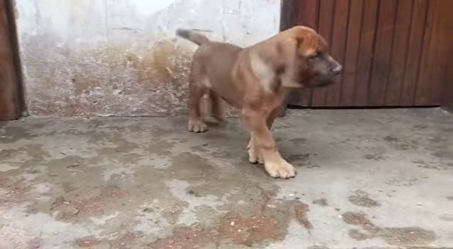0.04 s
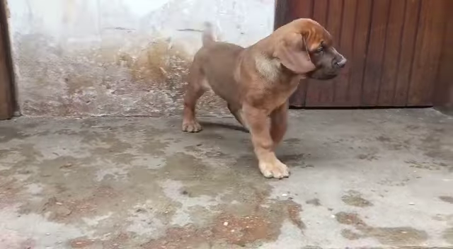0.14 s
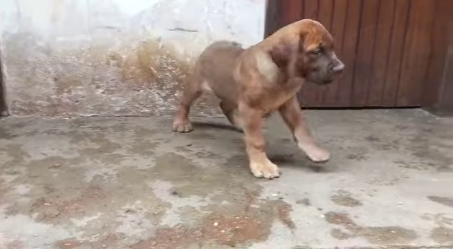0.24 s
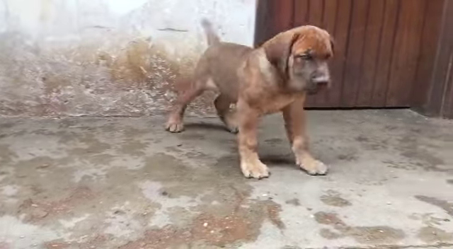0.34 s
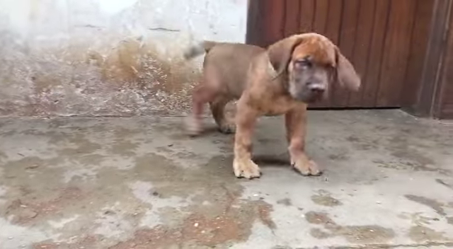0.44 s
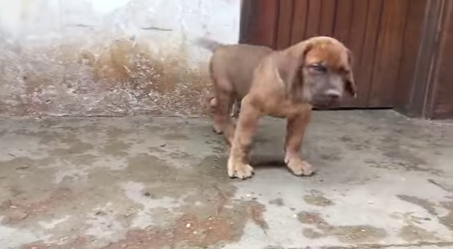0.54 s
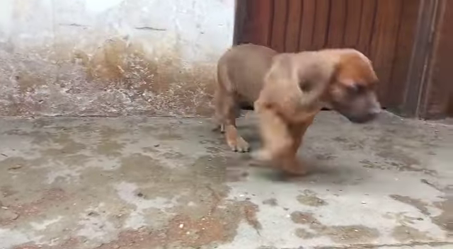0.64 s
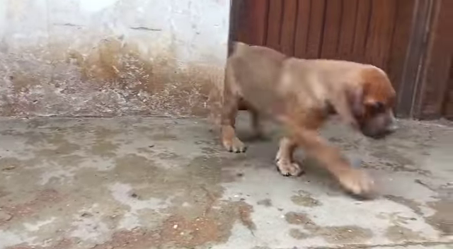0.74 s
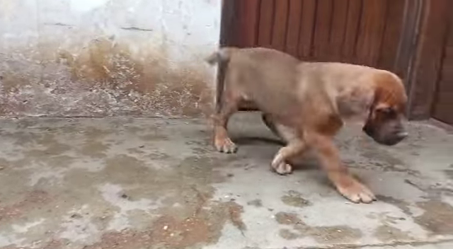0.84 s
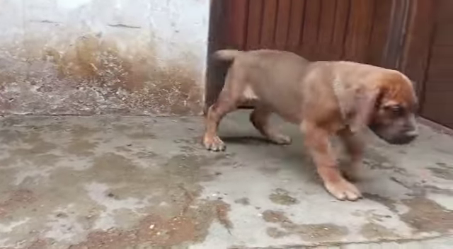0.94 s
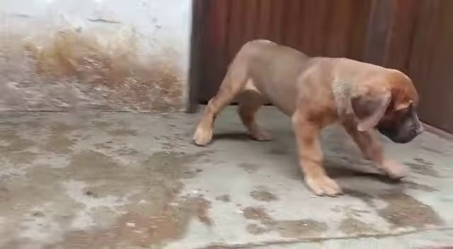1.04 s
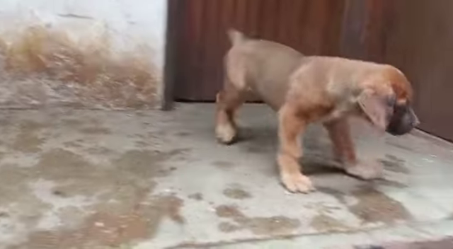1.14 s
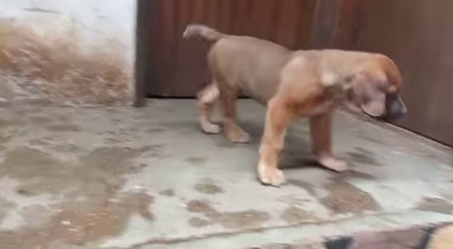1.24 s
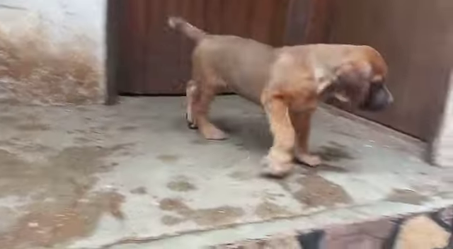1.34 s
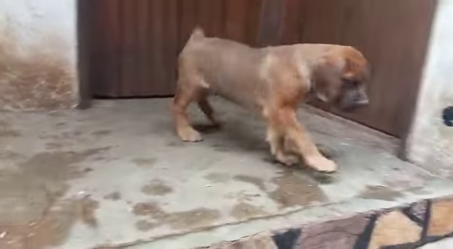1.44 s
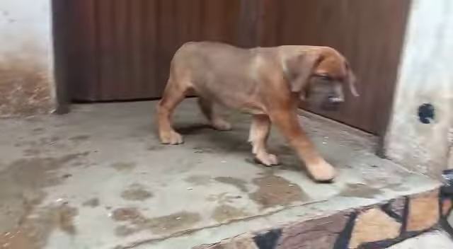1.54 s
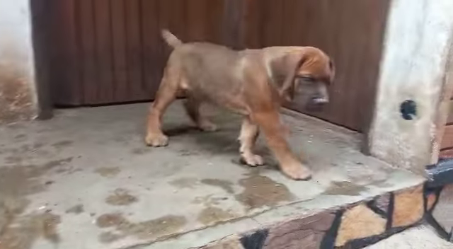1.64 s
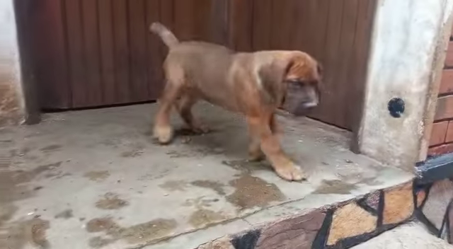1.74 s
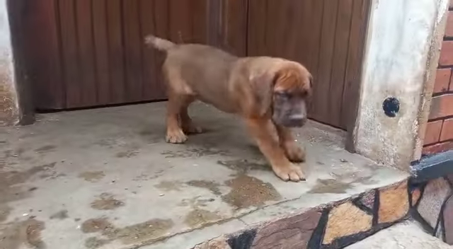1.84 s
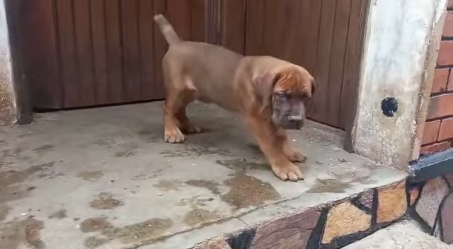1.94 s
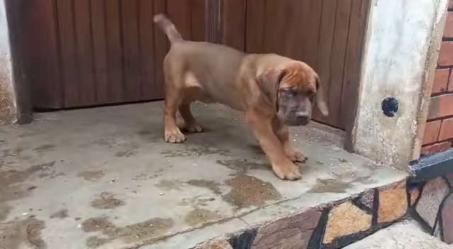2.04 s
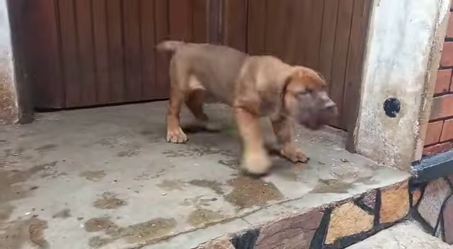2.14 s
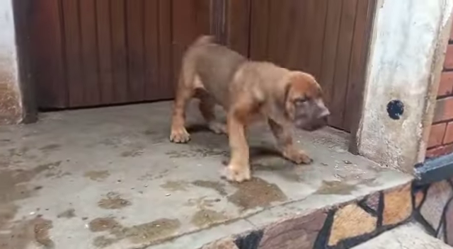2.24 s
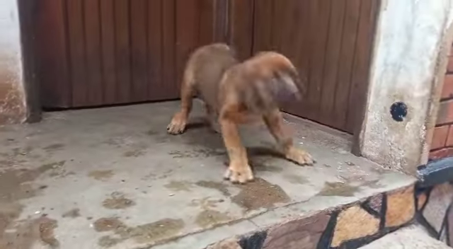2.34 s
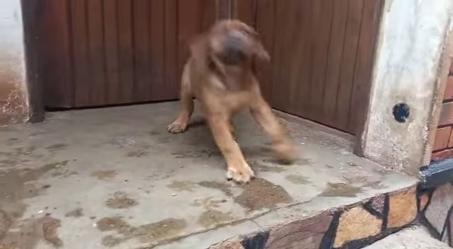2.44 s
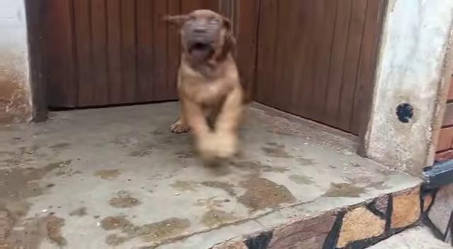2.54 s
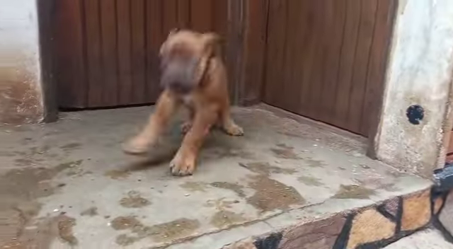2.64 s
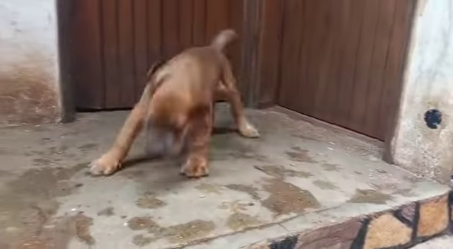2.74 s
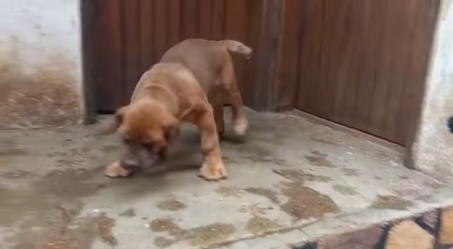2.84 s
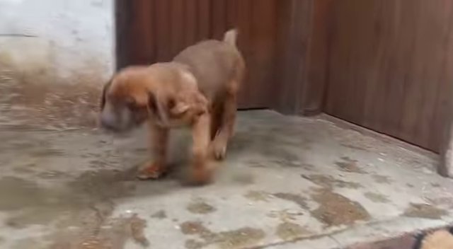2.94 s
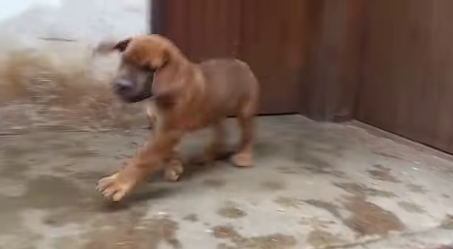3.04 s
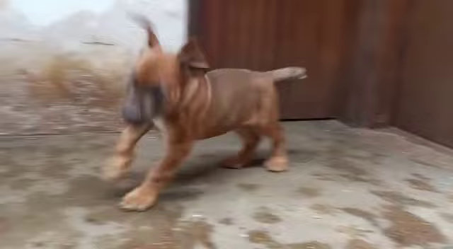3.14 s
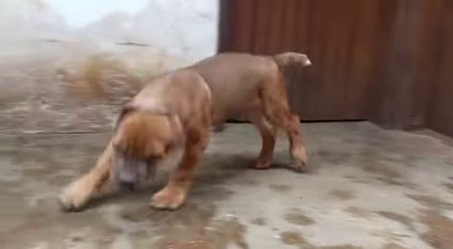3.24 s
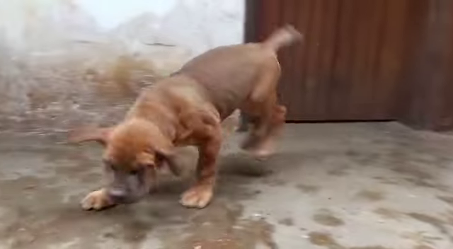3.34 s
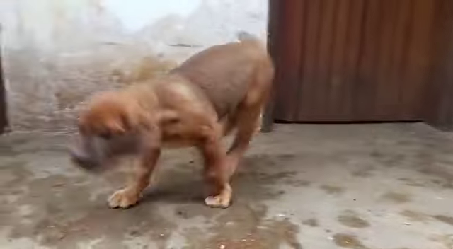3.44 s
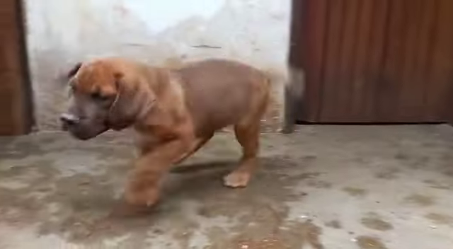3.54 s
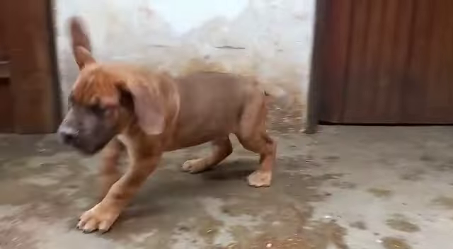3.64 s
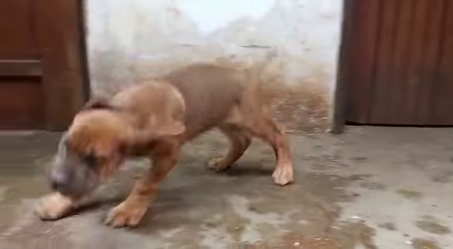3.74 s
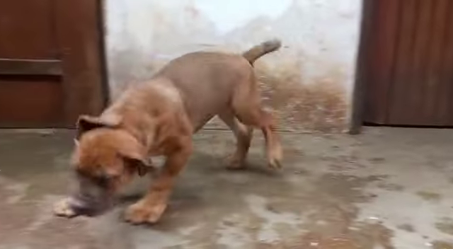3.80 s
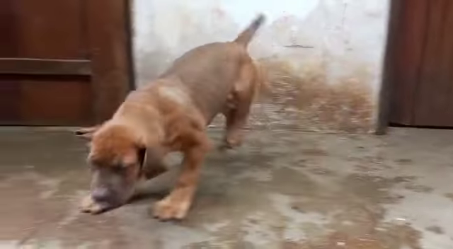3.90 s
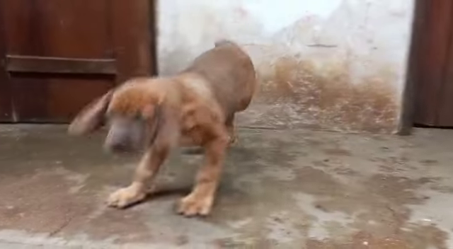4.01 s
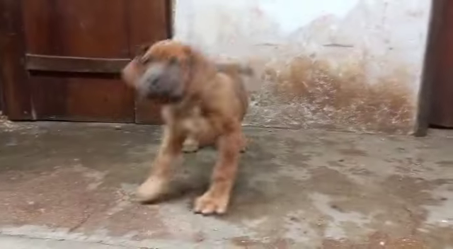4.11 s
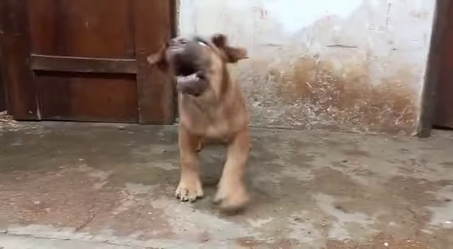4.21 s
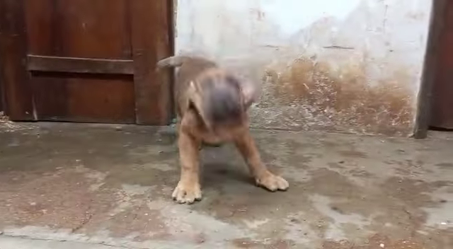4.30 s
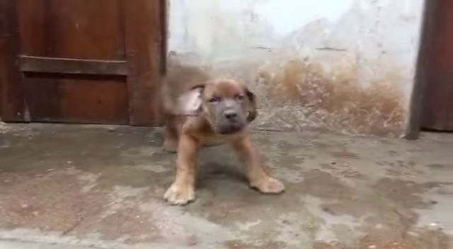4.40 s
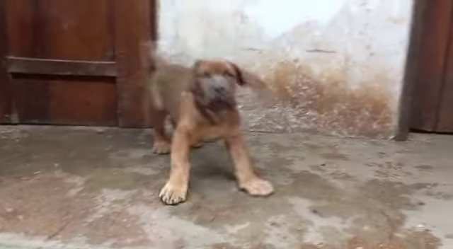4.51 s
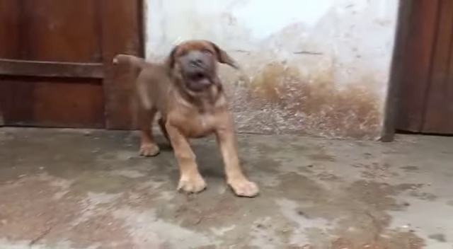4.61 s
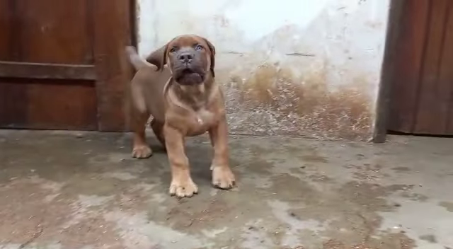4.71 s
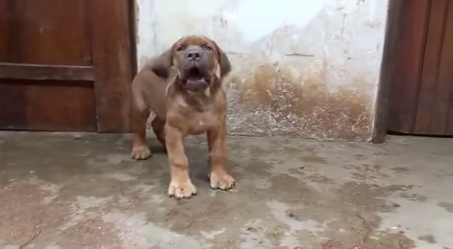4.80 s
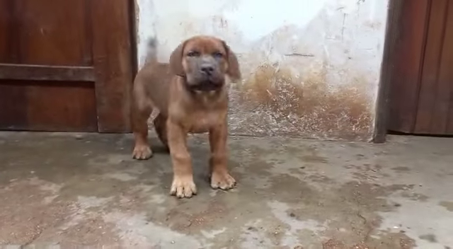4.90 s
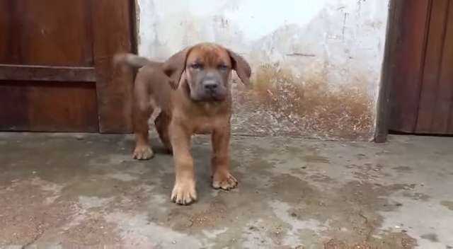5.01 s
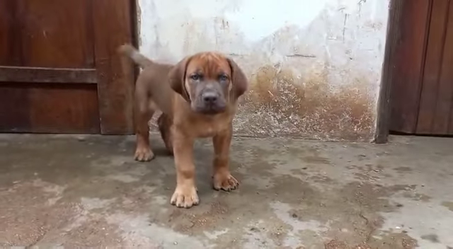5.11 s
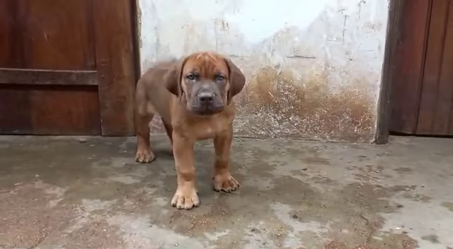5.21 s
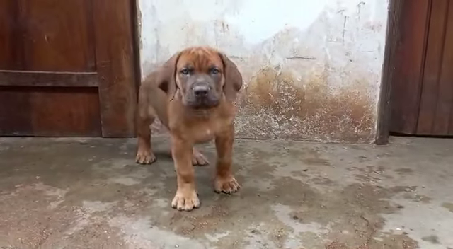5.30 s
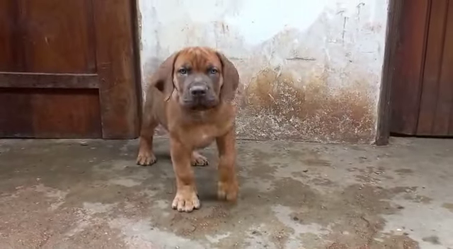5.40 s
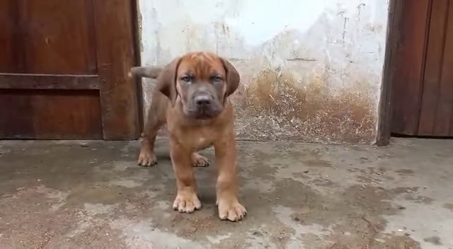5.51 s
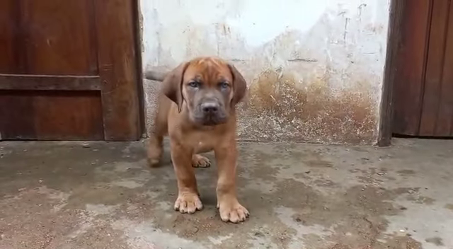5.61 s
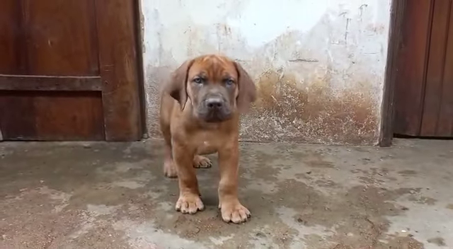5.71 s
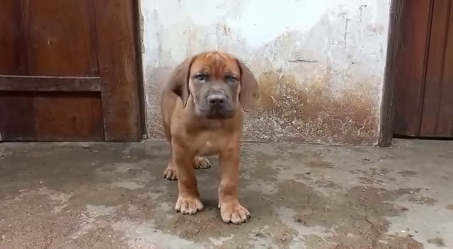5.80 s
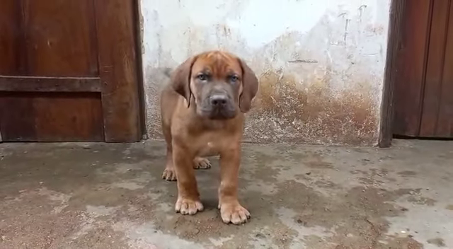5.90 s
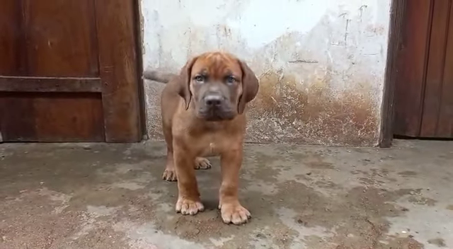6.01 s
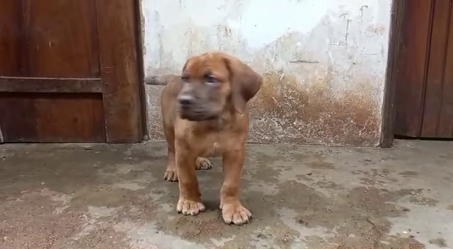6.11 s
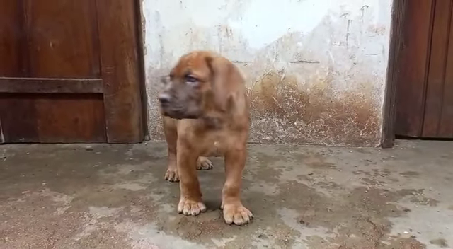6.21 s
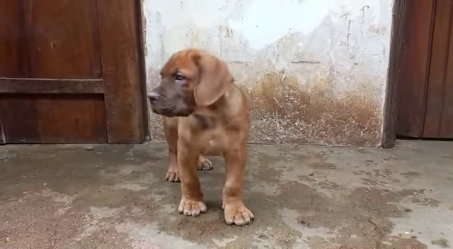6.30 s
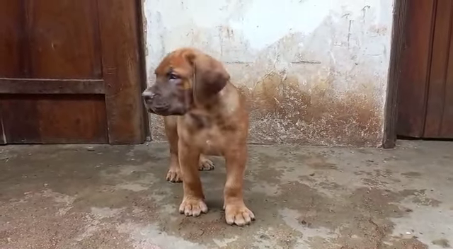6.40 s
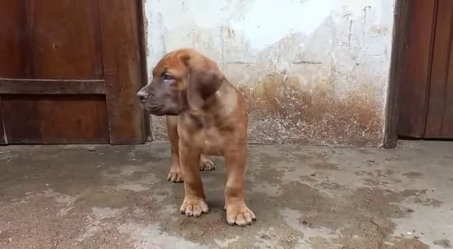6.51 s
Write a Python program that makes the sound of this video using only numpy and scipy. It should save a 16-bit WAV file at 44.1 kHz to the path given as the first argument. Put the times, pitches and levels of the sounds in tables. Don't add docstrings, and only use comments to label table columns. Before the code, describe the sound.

A young dog in a walled concrete yard, heard close by on a phone. Five high cracking yelps, framed by thin nose whistles, lead to a loud falling cry. Four rough, much louder barks follow, mixed with squeaks and low whines. One last cry sinks into a long soft whimper, then quiet hiss, claw ticks and distant metal knocks.

```python
import sys
import numpy as np
from scipy import signal
from scipy.fft import rfft, irfft, next_fast_len
from scipy.io import wavfile
from scipy.ndimage import uniform_filter1d, minimum_filter1d

SR = 44100
rng = np.random.default_rng(int(sys.argv[2]) if len(sys.argv) > 2 else 0)


def attenuation_scalar(level_db):
    decades = np.asarray(level_db, float) / 20
    return 10 ** decades


def transcribe(u):
    v = np.clip(np.atleast_2d(u).T, -1, 1)
    q = np.round(v * 32767).astype(np.int16)
    wavfile.write(sys.argv[1], SR, q)


N = 288855


def evened(x):
    return x / np.sqrt(np.mean(x ** 2) + 1e-20)


def read(points, hz):
    f, value = np.transpose(points)
    return np.interp(np.log(hz + 1), np.log(f + 1), value)


def along(rows, column=1):
    rows = np.array(rows)
    return np.interp(np.arange(N) / SR, rows[:, 0], rows[:, column])


def add(mix, s, sound):
    part = mix[..., round(s * SR):][..., :sound.shape[-1]]
    part += sound[..., :part.shape[-1]]


def colour(x, gain_db):
    size = next_fast_len(x.shape[-1])
    gain = attenuation_scalar(gain_db(np.fft.rfftfreq(size, 1 / SR)))
    return irfft(rfft(x, size) * gain, size)[..., :x.shape[-1]]


def noise(count):
    return rng.standard_normal(-(-count // 8192) * 8192)[:count]


def wobble(count, span):
    once = uniform_filter1d(noise(count), int(span))
    return evened(uniform_filter1d(once, int(span)))


def patchy(x, depth_db, bins, frames):
    z = signal.stft(x, nperseg=256)[2]
    field = noise(z.shape[-2] * z.shape[-1]).reshape(z.shape[-1], -1).T
    field = uniform_filter1d(uniform_filter1d(field, int(bins), 0), int(frames), 1)
    return signal.istft(z * attenuation_scalar(depth_db * evened(field)), nperseg=256)[1][..., :x.shape[-1]]


def diffuse(pair):
    # (f/Hz, left-right likeness [0-1])
    likeness = [(50, 0.67), (300, 0.98), (800, 0.7), (1500, 0.16), (4000, 0.067), (15000, 0.14)]
    z = rfft(pair)
    same = np.clip(read(likeness, np.fft.rfftfreq(pair.shape[1], 1 / SR)), 0, 1)
    return irfft([z[0], same * z[0] + np.sqrt(1 - same ** 2) * z[1]], pair.shape[1])


def aim(sound, side_db, lead):
    at = np.arange(len(sound))
    late = np.interp(at - lead, at, sound)
    return np.array([sound * attenuation_scalar(side_db / 2), late * attenuation_scalar(-side_db / 2)])


def background(dog):
    # (t/s, level/dB)
    gate_curve = [(0, -8), (.45, -17.5), (.9, -1.5), (1.55, -0.5), (2.05, -1), (2.2, -6.5), (2.24, -6.5),
                  (2.6, -8), (3.0, -9.5), (3.4, -4.5), (3.6, -12), (4.15, -3), (4.55, -12.5), (5.2, -12.5),
                  (5.75, -12.5), (6.55, -1.5)]
    # (t/s, half-width/s, level/dB)
    rumble_swells = [
        (5.137, 0.37, 30),
        (3.37, .08, 11),
        (3.56, 0.051, 11),
        (3.8, .06, 7.5),
        (6.38, 0.066, 7.5),
        (0.34, 0.066, 9.5),
    ]
    # (f/Hz, level/dB per Hz)
    hiss_curve = [(240, -34), (400, -12), (466, 0), (1340, -6.5), (4510, -1), (5850, -3.5), (6410, -6.5),
                  (7940, -11), (8710, -26.5), (12200, -14.5), (15600, -17)]
    # (f/Hz, level/dB per Hz)
    rumble_curve = [(15, -50.5), (25, -18), (43, -22), (81, -0.5), (144, -7.5), (231, -2.5), (371, -6.5),
                    (450, -6.5), (580, -39), (990, -120)]
    hiss, deep, upper = (diffuse(rng.standard_normal((2, N))) for _ in range(3))
    loud_db = 10 * np.log10(abs(uniform_filter1d((dog ** 2).mean(0), 1500)) + 1e-9)
    gate_db = along(gate_curve)
    bark_db = 0.6 * uniform_filter1d(np.maximum(loud_db + 29.5, 0), size=4000)
    t = np.arange(N) / SR
    swell_db = sum(db * np.exp(-((t - s) / width) ** 2) for s, width, db in rumble_swells)

    hiss = hiss * attenuation_scalar(0.45 * np.maximum(loud_db + 57.5, 0))
    hiss = patchy(hiss, depth_db=4.0, bins=3.1, frames=7.7)
    hiss = colour(hiss, lambda f: read(hiss_curve, f) + 6.0)
    hiss = hiss * attenuation_scalar(-63 + 0.87 * gate_db + 2.3 * wobble(N, 1500))

    lumps_db = 1.6 * wobble(N, 2500)
    swell_db = swell_db + lumps_db
    deep = evened(colour(deep, lambda f: read(rumble_curve, f) - 40 * (f > 180)))
    deep_db = -65 + 1.7 * gate_db + 0.6 * bark_db + 0.37 * swell_db
    deep = deep * attenuation_scalar(lumps_db + deep_db + 0.97 * wobble(N, 1500))
    upper = evened(colour(upper, lambda f: -18 * np.log2((f + 1) / 270) ** 2))
    upper = upper * attenuation_scalar(-63 + 1.47 * gate_db + bark_db + swell_db + 2.4 * wobble(N, 1500))
    return hiss + deep + upper


def whistle(length, start_hz, end_hz, db):
    u = np.linspace(0, 1, int(length * SR))
    high = end_hz > 5550
    waver = (0.005 + 0.013 * high) * wobble(len(u), 60)
    hz = (end_hz + (start_hz - end_hz) * np.exp(-2.5 * u)) * (1 + waver)
    phase = 2 * np.pi * np.cumsum(hz) / SR
    swell = np.minimum(u / 0.089, 1) * np.minimum((1 - u) / 0.32, 1)
    level = attenuation_scalar(db + (2.5 + 1.3 * high) * wobble(len(u), 280))
    return swell * level * (np.sin(phase) + attenuation_scalar(-21.0) * np.sin(2 * phase))


def yelp(high, low, scoop):
    start, crack, landing, high_hz, high_db = high
    held, end, low_hz, last_hz, low_db = low
    scoop_s, scoop_db, near_top = scoop
    sag_hz_per_s, fade_db_per_s = 500, 330
    mid_hz = low_hz + 0.23 * (high_hz - low_hz)
    return [(start, 0.77 * high_hz, high_db + scoop_db),
            (start + scoop_s, near_top * high_hz, high_db),
            (crack, high_hz, high_db - 4),
            ((crack + landing) / 2, mid_hz, min(high_db, low_db) - 5),
            (landing, low_hz, low_db),
            (max(held, landing + 0.001), low_hz - sag_hz_per_s * (held - landing), low_db),
            (end, last_hz, low_db - fade_db_per_s * (end - held))]


def strands(hz):
    orders = np.arange(3, 27) / 3
    drift = np.array([1 + 0.03 * wobble(len(hz), 330) for _ in orders])
    hold = np.array([attenuation_scalar(8 * wobble(len(hz), 180)) for _ in orders])
    turns = np.cumsum(orders[:, None] * hz * drift, 1) / SR
    return evened((hold * np.cos(2 * np.pi * turns)).sum(0))


def breath_puffs(hz, turns, sheen, tilt):
    # (f/Hz, level/dB per Hz)
    breath_curve = [(150, -54), (400, -46), (560, -2.5), (800, -2), (1200, -1), (1900, 1.5), (2800, -3.5),
                    (3700, -17), (4800, -20), (6200, -38), (7800, -32.5), (11000, -37.5), (15600, -43.5)]
    gusts = (1 + 0.4 * np.cos(2 * np.pi * turns)) * attenuation_scalar(2.5 * wobble(len(hz), 100))
    chaos = patchy(noise(len(hz)) * gusts, depth_db=4.5, bins=2, frames=5)
    chaos = evened(chaos) + strands(hz)
    floor_hz = 0.5 * np.median(hz)

    def shape_db(f):
        bass_cut = 30 * np.log2(np.maximum(floor_hz / (f + 1), 1))
        return read(breath_curve, f) + read(sheen, f) + tilt * np.log2((f + 1) / 2000) - bass_cut
    return evened(colour(chaos, shape_db))


def call(rows, opening, broken, mouth_hz, slope, pulse, treble, flicker):
    # (f/Hz, level/dB)
    throat_curve = [(300, -34), (520, -1), (780, 10.5), (1300, -2), (2000, 0), (2900, 8.5), (3700, -6.5),
                    (4800, -8.5), (5800, -29.5), (6600, -37), (9000, -35), (12500, -35), (15000, -41)]
    # (start t/s, end t/s, half-pitch lift/dB)
    uneven_beats = [
        (2.112, 2.146, 16),
        (4.214, 4.236, 14),
    ]
    # (t/s, half-width/s, level/dB)
    throat_swells = [(1.722, 0.011, 10), (1.394, .012, 6.5), (1.893, 0.0067, 7), (4.803, .009, 9.5),
                     (3.688, 0.0038, 3), (0.13, 0.0066, 2.5), (.245, .008, 2.5), (.934, .008, 5.5),
                     (.56, .007, 4.5), (0.73, .01, 4.5), (0.16, 0.013, 3.5), (4.225, .015, 2.5)]
    treble_points = (5000, 6100, 8000, 12500)
    break_s = 0.009
    s, *columns = np.transpose(rows)
    t = np.arange(s[0], s[-1], 1 / SR)
    hz, effort_db = (np.interp(t, s, c) for c in columns)
    changed = np.clip((t - broken[0]) / break_s + 0.5, 0, 1)
    breath_db, half_db, bright = (a + (b - a) * changed for a, b in zip(opening, broken[1:]))
    k = np.arange(1, 53)[:, None] / 2
    lift_db = 0
    for start, end, db in uneven_beats:
        lift_db = lift_db + db * np.clip(np.minimum(t - start, end - t) / break_s + 0.5, 0, 1)
    half_db = half_db + (k > 1) * lift_db
    bright = bright + 0.41 * (effort_db - effort_db.max())
    rough = attenuation_scalar(breath_db)
    harsh = np.minimum(rough, 1)
    hz = hz * (1 + (0.0022 + 0.032 * harsh) * wobble(len(t), 150))
    turns = np.cumsum(hz) / SR

    partial_hz = k * hz
    level_db = read(throat_curve, partial_hz)
    octaves = np.log2(np.clip(k, 1, np.maximum(mouth_hz / hz, 1)))
    level_db = level_db + bright / (1 + (partial_hz > 6300)) * octaves
    level_db = level_db + slope * np.log2(np.clip(partial_hz / mouth_hz, 1, 2)) * (partial_hz < 6300)
    level_db = level_db - 20 * harsh * (k > 1)
    level_db = level_db + half_db * (k % 1 > 0) * (1.5 + (k < 1))
    for db, orders in zip(pulse, (2, 3, (4, 6, 8), (5, 7, 9))):
        level_db = level_db + db * np.isin(k, orders)
    sheen = list(zip(treble_points, (0, *treble)))
    size = attenuation_scalar(level_db + read(sheen, partial_hz)) * (partial_hz < 15500)
    size = size / np.sqrt((size ** 2).sum(0) / 2)

    shimmer_db = np.minimum(2.5 + 0.9 * (k - 1), 6) * [wobble(len(t), 200) for _ in k]
    size = size * attenuation_scalar(shimmer_db * (flicker[0] + (flicker[1] - flicker[0]) * changed))
    surge_db = sum(db * np.exp(-((t - at) / width) ** 2) for at, width, db in throat_swells)
    size = size * attenuation_scalar((k == 1) * surge_db)
    folds = (size * np.cos(2 * np.pi * k * turns + 0.3 * k ** 2)).sum(0)
    folds = folds * attenuation_scalar(1.9 * harsh * wobble(len(t), 90))
    puffs = breath_puffs(hz, turns, sheen, pulse[-1])
    voice = (folds + rough * puffs) / np.sqrt(1 + rough ** 2)
    return attenuation_scalar(effort_db) * voice * signal.windows.tukey(len(t), min(0.014 * SR / len(t), 1))


def yard(x):
    # (f/Hz, time to fall 60 dB/s)
    ring_times = [(300, 0.9), (790, 0.55), (2090, 0.52), (5510, 0.48), (12000, 0.32)]
    # (t/s, level/dB)
    first_echoes = [
        (.004, 3),
        (.011, -7),
        (.022, 1.5),
        (0.033, -18),
        (0.048, -8),
        (.075, -8.5),
        (.093, -5.5),
    ]
    taps = np.zeros((2, SR))
    at = np.arange(500, SR - 20, 20) + rng.integers(0, 20, (2, (SR - 501) // 20))
    np.put_along_axis(taps, at, rng.choice([-1., 1.], at.shape), 1)
    hz, t, z = signal.stft(taps, SR, nperseg=256)
    decay = np.minimum(t / 0.0098, 1) * attenuation_scalar(-60 * t / read(ring_times, hz)[:, None])
    tail = signal.istft(z * decay, SR, nperseg=256)[1]
    tail = attenuation_scalar(-3) * tail / np.linalg.norm(tail[0])
    for s, db in first_echoes:
        tail[[0, 1], round(s * SR) + rng.integers(-12, 12, 2)] += attenuation_scalar(db - 11.0)
    return signal.fftconvolve(x[None], diffuse(tail), axes=1)[:, :N]


def moan(length, hz, db, waver=0.056):
    count = int(length * SR)
    turns = np.cumsum(hz * (1 + waver * wobble(count, 600))) / SR
    return attenuation_scalar(db) * np.hanning(count) * np.sin(2 * np.pi * turns)


def sniff():
    length_s, nose_hz = 0.071, 4650
    t = np.arange(0, length_s, 1 / SR)
    hiss = colour(noise(len(t)), lambda f: -150 * np.log2((f + 1) / nose_hz) ** 2)
    return attenuation_scalar(-50) * evened(hiss) * np.minimum(t / 0.0037, 1) * np.sqrt(1 - t / length_s)


def tick(db):
    t = np.arange(0, 0.03, 1 / SR)
    scratch = evened(colour(noise(len(t)), lambda f: -14 * np.log2((f + 1) / 11000) ** 2))
    return attenuation_scalar(db - 5.0 - 60 * t / 0.035) * scratch


def clank(db, rattle_t60, modes):
    t = np.arange(int(0.7 * SR)) / SR
    ring = np.zeros(len(t))
    for hz, level, t60 in modes:
        fuzz = attenuation_scalar(6 * wobble(len(t), 70))
        blur = 1.1 * wobble(len(t), 508)
        ring += fuzz * attenuation_scalar(level - 60 * t / t60) * np.sin(2 * np.pi * hz * t + blur)
    rattle = evened(colour(rng.standard_normal(len(t)), lambda f: -22 * np.log2((f + 1) / 3800) ** 2))
    return (ring + attenuation_scalar(db - 60 * t / rattle_t60) * rattle) * np.minimum(t / 0.013, 1)


def scene():
    # (t/s, f/Hz, effort level/dB)
    first_yelp = [(.042, 1222, -65), (.056, 1220, -38), (.085, 1190, -43.5), (.1, 900, -40),
                  (.15, 861, -38), (.18, 847, -35), (.228, 803.6, -41), (.245, 798, -33.5),
                  (.275, 563, -62.5)]
    # (start t/s, crack t/s, landing t/s, f/Hz, effort level/dB)
    high_notes = [
        (0.509, 0.572, 0.63, 1216, -28.5),
        (0.88, 0.942, 0.96, 1194, -19),
    ]
    # (held until t/s, end t/s, landing f/Hz, last f/Hz, effort level/dB)
    low_notes = [
        (0.625, 0.716, 814, 729, -29.5),
        (0.986, 1.064, 890, 699, -24.5),
    ]
    # (length/s, first level/dB re high note, share of the high note reached)
    scoops = [
        (0.033, -19, 0.96),
        (.034, -16.5, 0.96),
    ]
    # (t/s, f/Hz, effort level/dB)
    late_yelps = [
        [(1.287, 940, -26.5), (1.308, 1174, -16.5), (1.325, 1226, -12.5), (1.346, 1223, -14),
         (1.36, 1102, -18.5), (1.372, 931, -19.5), (1.394, 853, -17), (1.415, 739, -21), (1.445, 535, -42.5)],
        [(1.686, 957, -36), (1.702, 1068, -25.5), (1.722, 1143, -23), (1.745, 1189, -27), (1.764, 1152, -30),
         (1.785, 910.5, -25.5), (1.868, 866, -23.5), (1.893, 699, -27.5), (1.906, 640, -41.5)],
    ]
    # (t/s, f/Hz, effort level/dB)
    barks = [
        [(2.522, 433, -38), (2.55, 590, -28.5), (2.563, 648.6, -10.5), (2.58, 750.5, -9.5), (2.6, 839.7, -9),
         (2.63, 858.3, -10.5), (2.645, 895, -34.5)],
        [(3.22, 907, -27.5), (3.234, 760, -18), (3.254, 745, -10), (3.261, 918.4, -8.5), (3.28, 896.4, -9.5),
         (3.288, 595, -10.5), (3.32, 597.5, -13.5), (3.355, 588.7, -17.5), (3.372, 604.4, -37)],
        [(3.64, 755, -29), (3.66, 752.5, -15.5), (3.673, 774, -13.5), (3.687, 787.6, -6), (3.698, 836, -9.5),
         (3.703, 999.3, -16), (3.75, 932, -13.5), (3.8, 982, -25.5), (3.83, 965, -44.5)],
        [(4.178, 660, -14.5), (4.19, 706, -11), (4.207, 794.4, -7), (4.232, 778.3, -5.5), (4.243, 809, -3),
         (4.3, 808, -17), (4.318, 771, -15.5), (4.355, 750, -25.5)],
    ]
    # (t/s, f/Hz, effort level/dB)
    cries = [
        [(2.085, 1114, -25.5), (2.105, 980.4, -8), (2.134, 986.5, -7.5), (2.15, 1047, -7), (2.168, 1067, -7.5),
         (2.183, 1236, -18), (2.225, 948, -34), (2.3, 676, -26.5), (2.345, 548, -36.5)],
        [(4.751, 744, -31), (4.784, 762, -21.5), (4.791, 794, -22.5), (4.801, 790, -17), (4.809, 815, -16.5),
         (4.815, 1110, -18), (4.848, 1136, -20.5), (4.868, 821, -24), (4.915, 681, -32.5)],
        [(3.425, 586, -42), (3.44, 583, -27.5), (3.47, 590, -26), (3.5, 602, -56), (3.565, 607, -54.5),
         (3.585, 607, -37.5), (3.63, 571, -44)],
        [(3.85, 540, -46.5), (3.89, 522, -24.5), (3.96, 506.7, -25), (4.01, 548, -61), (4.07, 520, -39.5)],
        [(4.905, 643, -44), (4.95, 576, -33), (5.02, 583, -31), (5.1, 572.5, -33.5), (5.22, 580.4, -34.5),
         (5.27, 589, -37.5), (5.31, 600, -39)],
        [(2.61, 980, -24.5), (2.62, 1000, -16), (2.632, 1005, -14.5), (2.642, 1010, -30.5)],
    ]
    # (breath noise/dB re voice, half-pitch level/dB, brightness/dB per octave)
    openings = [(-24.5, -35, -14.5), (-32, -50, -14), (-33.5, -46.5, -13.5), (-29, -49, -12.5),
                (-34.5, -45, -14.5), (-19, -30, 6), (-15, -34, 7.5), (-32, -39, 1), (-20, -32, 0.5),
                (-22.5, -22.5, 5.5), (-26, -49, -2.5), (-22.5, -35.5, -19), (-21, -43.5, -12.5),
                (-33.5, -46, -9.5), (-26, -45, -3.5)]
    # (t/s, breath noise/dB re voice, half-pitch level/dB, brightness/dB per octave)
    breaks = [(0.092, -35.5, -43, -10), (0.47, -39, -39, -5.5), (.955, -26, -45, -13),
              (1.365, -33.5, -34.5, -19.5), (1.768, -32.5, -45, -8), (2.585, -10.5, -26.5, -2),
              (3.258, -2, -23.5, -6.5), (3.701, -15, -16.5, 6), (4.238, 1, -14.5, -8.5),
              (2.176, -18, -29, -17), (4.812, -27.5, -47, -4), (3.52, -19.5, -47.5, -20.5),
              (3.5, -23, -32.5, -18), (5.0, -25.5, -40, -4.5), (3, -25, -43.5, -3)]
    # (harmonic 2/dB, 3/dB, 4-6-8/dB, 5-7-9/dB, breath tilt/dB per octave)
    pulses = [(1, -4, -1, 3.5, 7.5), (-5.5, 1, -9, -22, 10), (-0.5, 0, -9.5, -1, 12), (0, 4, -13, 2, -4),
              (-0.5, -0.5, -8, 4, 6), (3, -0.5, -3, -2, 2.5), (10.5, -1.5, -15, -4, 4),
              (9, 1, -2, -0.5, -4), (2, 0.5, -2.5, -1, -0.5), (3, -4, -14, -1, 7),
              (4.5, 2, -5.5, -2.5, -0.5), (0.5, 1, -15.5, -0.5, 1), (1.5, -8.5, -1, 9, 1.5),
              (0, -4.5, -5.5, 1.5, -9), (14.5, 10, -5, -4.5, -0.9)]
    # (near 6 kHz/dB, near 8 kHz/dB, near 12.5 kHz/dB)
    trebles = [(12, 2, 0.11), (18.5, 2, .1), (2.5, -5, 0.11), (-0.5, -12.5, .1), (8.5, 1.5, .1),
               (11, -11.5, 0.09), (-3, 0.8, .1), (-5, 4, .1), (-6.5, 4, .1), (-2.5, 2, .1), (-5, 1, .1),
               (-1.5, 1, .1), (-4.5, -3, .1), (-9, -7, 2), (1, -1.5, .1)]
    flickers = [(.8, .8), (.6, .9), (.6, .9), (.5, .9), (.5, .6), (.3, .7), (.2, .9), (.1, .6), (.15, 1),
                (.5, .8), (.1, .7), (.2, .2), (.2, .2), (.6, .7), (.3, .3)]
    # (left-right level/dB, left lead/samples, mouth f/Hz, slope above it/dB per octave, yard send/dB)
    facings = [(0, 1.7, 2480, 9.5, 1), (0, 9.4, 1540, -14, 4), (1.5, 3.2, 1900, -3, 2),
               (0.5, 3.2, 2600, -6, -0.5), (-0.5, 7.7, 2450, 11.5, -4.5), (2.5, 0.39, 2700, -17.5, -1),
               (0, 3.1, 2800, 0.5, -2.5), (-2, 1.9, 9000, -8, 0), (1, 2.2, 1800, -1, -3.5),
               (2.5, 2.1, 3100, -16.5, -4), (-5.5, 8, 8230, -12.5, -2), (-3.5, 2.3, 2300, -1, -13),
               (0.5, 5.4, 5100, -3, -6.5), (0, 6.2, 3060, 10, -7), (-0.5, 3, 2000, -12, -8.5)]
    # (t/s, length/s, settled f/Hz, level/dB, left-right level/dB)
    rising = [
        (.003, 0.15, 5870, -54, 3),
        (0.489, 0.15, 5860, -44, 0.5),
        (0.673, 0.07, 5090, -44.5, 13),
        (0.858, 0.14, 6030, -37, 0),
        (1.263, 0.16, 5990, -43, -12),
        (2.077, 0.045, 5910, -39, -9),
        (2.755, 0.08, 5650, -52.5, -11),
        (3.63, 0.022, 5300, -46.5, -11),
        (4.745, 0.014, 5440, -43.5, -3),
    ]
    falling = [
        (0.238, 0.099, 4993, -41.5, -3.5),
        (1.031, 0.098, 4835, -31.5, 11),
        (1.445, 0.096, 5250, -42, -2.5),
        (1.641, 0.18, 5780, -35.5, -1.5),
        (1.876, 0.12, 5010, -34.5, -9),
        (2.363, 0.089, 5160, -47, 3),
        (2.753, 0.084, 4870, -26.5, 2),
        (2.807, 0.096, 4688, -26.5, -5.5),
        (3.967, 0.032, 5210, -53, 3),
    ]
    swoop = [
        (5.266, .056, 5380, -42.5, -12),
    ]
    flick = [
        (2.902, .028, 5620, -46, -9),
    ]
    lead_in = [
        (5.19, .085, 5700, -61, -12),
    ]
    # (t/s, level/dB)
    echo_gate = [(0, 0), (5.34, 0), (5.44, -3.5), (6.55, -22)]
    # (t/s, length/s, f/Hz, level/dB)
    moans = [
        (1.8, 0.36, 280, -47.5),
        (3.063, 0.2, 223.4, -61.5),
        (5.515, 0.34, 337.3, -72),
    ]
    # (t/s, length/s, f/Hz, level/dB)
    chest_notes = [
        (3.28, .042, 591, -10),
        (3.315, .055, 585, -11),
    ]
    # (t/s, level/dB)
    claw_ticks = [
        (5.7691, -64),
        (5.8175, -61),
        (5.9582, -57),
    ]
    # (t/s, rattle level/dB, rattle fall by 60 dB/s, [(f/Hz, level/dB, fall by 60 dB/s)])
    clanks = [
        (5.811, -63, 1, [(1948, -64.5, 0.76), (2017, -66.5, 0.48), (4530, -67, 0.44), (5200, -65, 0.47)]),
        (6.172, -69, 0.87, [(1878, -64.5, 0.9), (2358, -62.5, 0.54), (2874, -69, 1.2), (3270, -59.5, 0.83), (4425, -66, 1), (4820, -78, 1.2), (5530, -75, 0.99)]),
        (6.3, -71, 0.92, [(2960, -71, 1.3), (4170, -79, 0.99), (4670, -70.5, 0.95)]),
        (6.485, -81, 0.95, [(1200, -70, .6), (2310, -73, .6), (4600, -68.5, .6)]),
    ]

    near, sent = np.zeros((2, N)), np.zeros(N)
    calls = [first_yelp] + [yelp(*notes) for notes in zip(high_notes, low_notes, scoops)]
    calls = calls + late_yelps + barks + cries
    settings = zip(calls, openings, breaks, pulses, trebles, flickers, facings)
    for rows, opening, broken, pulse, treble, flicker, facing in settings:
        side_db, lead, mouth_hz, slope, wet_db = facing
        voice = call(rows, opening, broken, mouth_hz, slope, pulse, treble, flicker)
        add(near, rows[0][0], aim(voice, side_db, lead))
        add(sent, rows[0][0], attenuation_scalar(wet_db) * voice)
    for share, kind in [(0.975, rising), (1.035, falling), (1.05, swoop), (0.87, flick), (0.93, lead_in)]:
        for s, length, hz, db, side_db in kind:
            voice = whistle(length, share * hz, hz, db)
            add(near, s, aim(voice, side_db, 2.3))
            add(sent, s, attenuation_scalar(-5.0) * voice)
    add(near, 3.575, aim(sniff(), 0, 2))
    dog = near + attenuation_scalar(along(echo_gate)) * yard(sent)
    dog = attenuation_scalar(-3.0) * colour(dog, lambda f: -26 * np.log2(np.maximum(500 / (f + 20), 1)))
    for s, *hum in moans:
        add(dog, s, moan(*hum))
    for s, *note in chest_notes:
        add(dog, s, moan(*note, waver=0.005))
    for s, db in claw_ticks:
        add(dog, s, aim(tick(db), 0, 2))
    far = np.zeros(N)
    for s, *knock in clanks:
        add(far, s, clank(*knock))
    return dog + aim(far, -4.5, 6.9) + 1.1 * yard(far) + background(dog)


def roll_off(x):
    return signal.sosfilt(signal.butter(12, 15740, fs=SR, output="sos"), x)


def record(dry):
    # (f/Hz, left-right level/dB)
    port_curve = [(60, 0), (110, -4), (200, -5.5), (380, 1.5), (700, 0), (1290, 1), (2380, -8), (4400, -24),
                  (8120, 12), (15000, 0.5)]
    ports = colour(dry, lambda f: np.outer([0.5, -0.5], 0.71 * read(port_curve, f)))
    peak = -minimum_filter1d(-abs(ports).max(0), size=301)
    limited = ports / uniform_filter1d(np.maximum(peak / 0.9, 1), size=301)
    return roll_off(limited)


dry = scene()
out = record(dry)
transcribe(out)
```